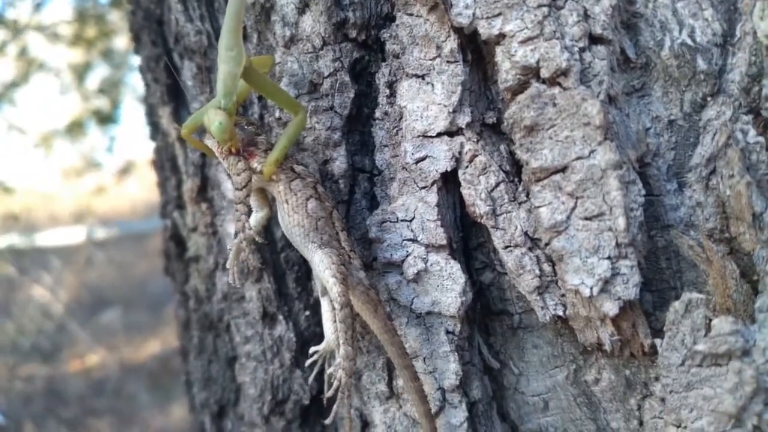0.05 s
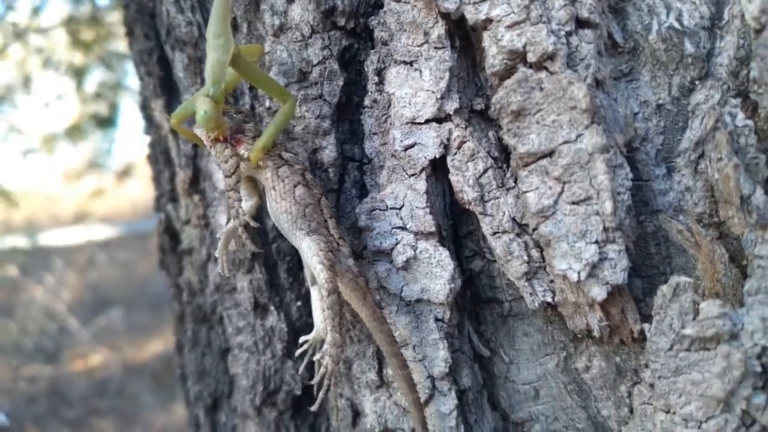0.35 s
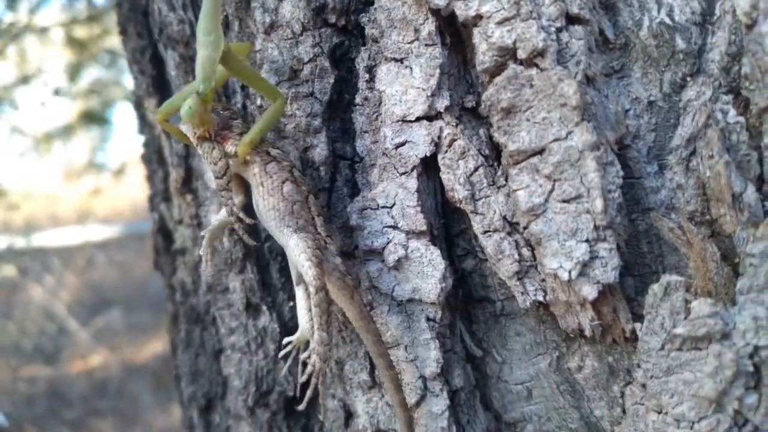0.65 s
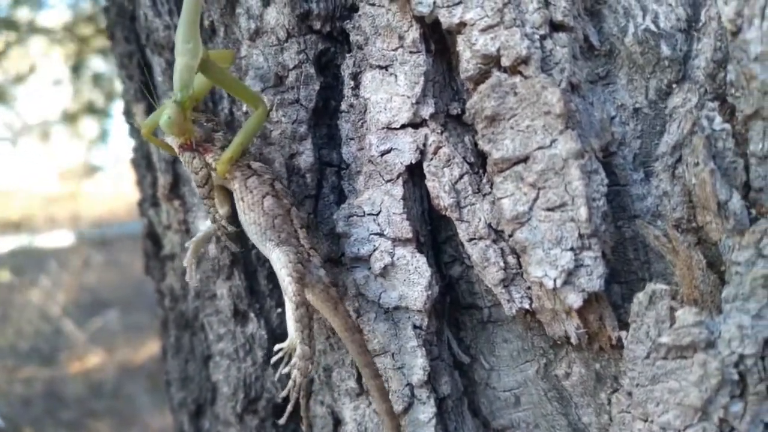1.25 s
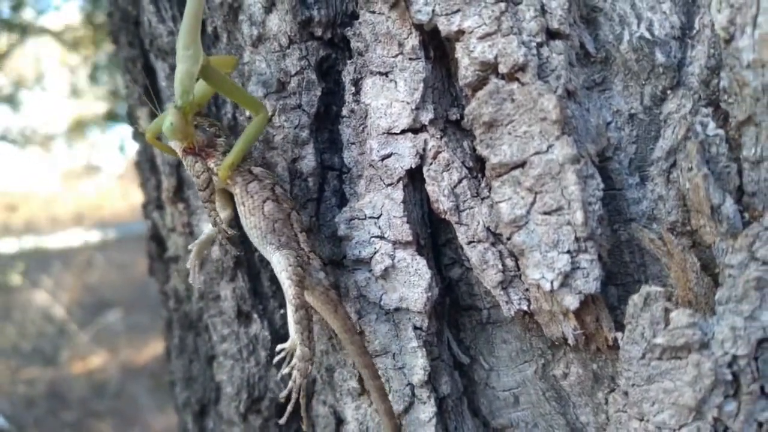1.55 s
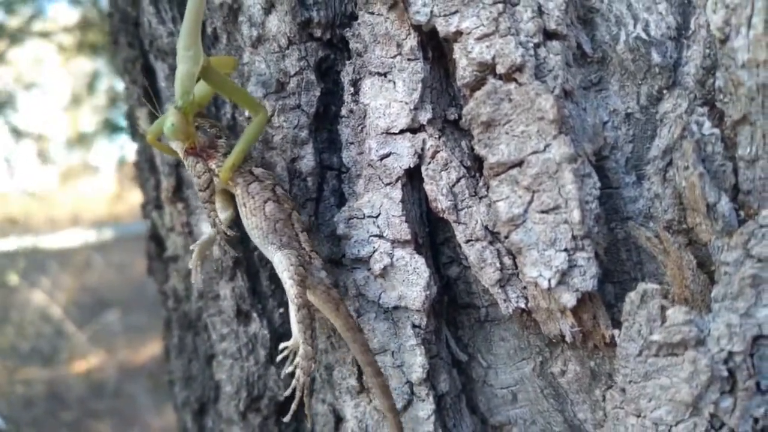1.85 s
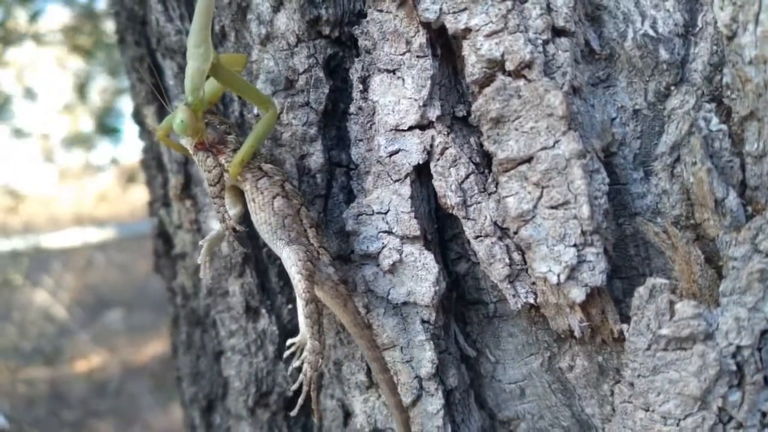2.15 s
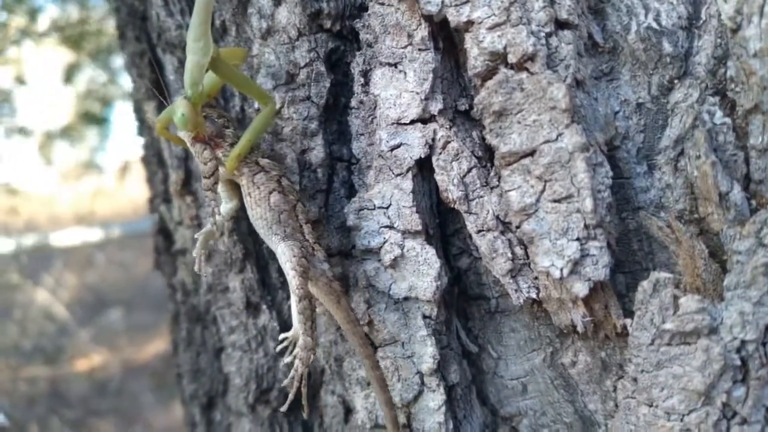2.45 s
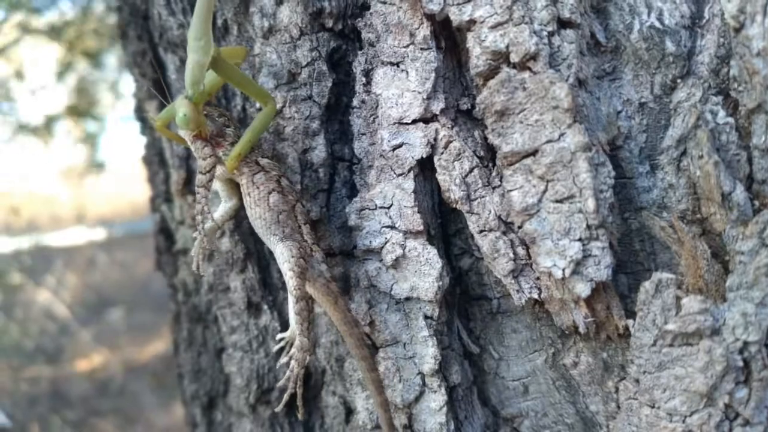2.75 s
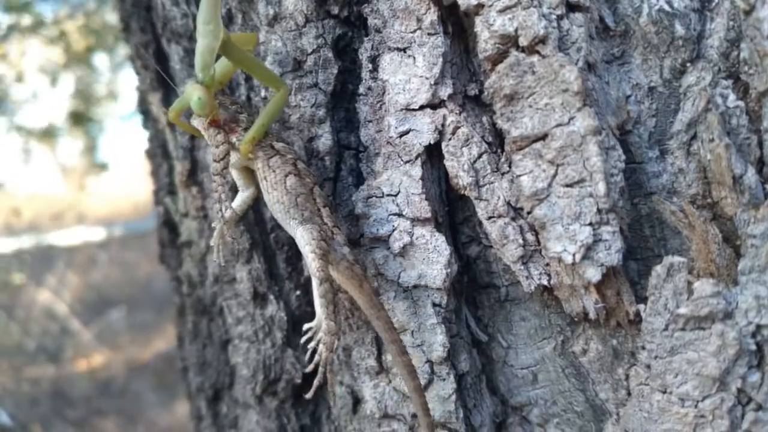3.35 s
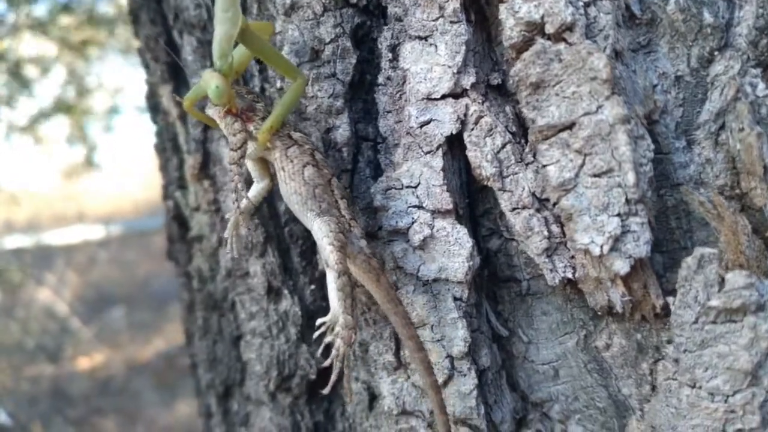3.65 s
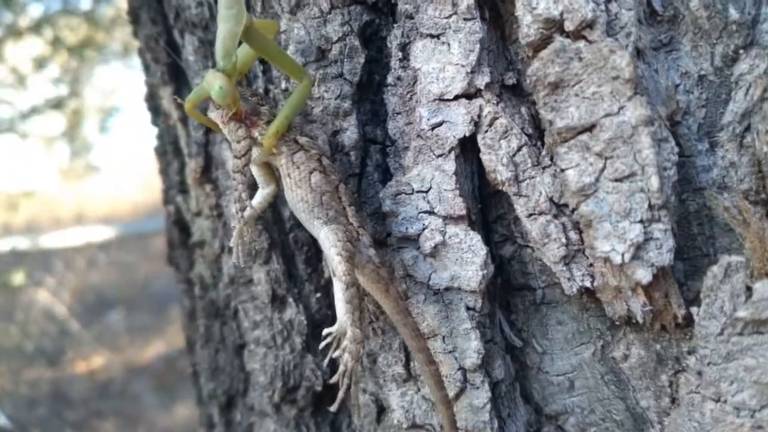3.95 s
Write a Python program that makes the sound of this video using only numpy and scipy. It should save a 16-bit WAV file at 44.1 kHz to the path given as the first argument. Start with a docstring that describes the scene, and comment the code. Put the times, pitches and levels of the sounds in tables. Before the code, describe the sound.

Wind rumbles low on the microphone, mostly on the left. Weak puffs lead to a gust with a soft knock at about 1.2 seconds; more follow from 1.7, strongest from 3 to 4. A thin hiss runs underneath. Very faint high bird chirps come near 0.6, 1.4, 2.2 and 3.7 seconds, tiny ticks near 1.4, 1.7 and 3.9, and a faint bark scrape at 3.3.

```python
"""Light gusts of wind buffet the two microphones of a camera held close to a tree trunk.
Swirling air makes each microphone's opening rumble by itself, brighter as the gust grows,
and now and then a single swirl lands with a soft knock. Behind the wind lie a thin steady hiss,
a few faint high chirps (probably small birds) echoing off the trees, a few tiny dry ticks
and one soft scrape on the bark."""
import sys
import numpy as np
from scipy import signal
from scipy.fft import rfft, irfft
from scipy.io import wavfile
from scipy.ndimage import uniform_filter1d

SR = 44100
rng = np.random.default_rng(int(sys.argv[2]) if len(sys.argv) > 2 else 0)


def inscribe(sig):
    """Save sig as 16-bit PCM at rate SR to the path in sys.argv[1].

    A 1-D sig is mono; a 2-D sig holds one channel per row.
    Samples are clipped to [-1, 1] before scaling.
    """
    pcm = np.round(np.clip(np.atleast_2d(sig).T, -1, 1) * 32767)
    wavfile.write(sys.argv[1], SR, pcm.astype(np.int16))


N = 4 * SR


def amp(db):
    """Turns decibels into a number to multiply a sound by."""
    return 10 ** (np.asarray(db) / 20)


def unit_level(x):
    """Scales a signal so that its average power is 1."""
    return x / np.sqrt(np.mean(x ** 2) + 1e-20)


def value_at(table, hz):
    """Reads between a table's rows, with frequencies spaced like musical pitch."""
    row_hz, value = np.transpose(table)
    return np.interp(np.log(hz + 1), np.log(row_hz + 1), value)


def noise(size, tone):
    """Noise of power 1; tone(hz) says how strong each frequency is."""
    hz = np.fft.rfftfreq(size, 1 / SR) + 1
    return unit_level(irfft(rfft(rng.standard_normal(size)) * tone(hz), size))


def wander(size, per_s):
    """A smooth random wobble, up to about per_s swings a second."""
    return noise(size, lambda f: 1 / (1 + (f / per_s) ** 4))


def hump(hz, octaves):
    """A tone for noise: strongest at hz, fading away above and below."""
    return lambda f: np.exp(-.5 * (np.log2(f / hz) / octaves) ** 2)


def place(mix, start, sound, lean_db):
    """Adds a sound to the mix. Lean is how much louder it is on the left than on the right."""
    part = mix[:, round(start * SR):][:, :len(sound)]
    part += amp([[lean_db / 2], [-lean_db / 2]]) * sound[:part.shape[1]]


# The wind at each microphone. Each row: time in seconds, strength in dB.
LEFT_GUSTS = [(0.0, -40.5), (0.02, -33), (0.17, -57), (0.37, -50), (0.57, -86), (0.77, -49), (0.8, -44),
              (0.95, -60), (1.04, -74), (1.06, -34.5), (1.16, -23), (1.29, -50), (1.4, -37.5), (1.52, -66),
              (1.69, -75), (1.72, -35), (1.76, -43.5), (1.79, -30), (1.82, -39), (1.89, -26.5),
              (1.92, -30.5), (1.97, -27.5), (2.35, -31.5), (2.38, -42.5), (2.4, -27), (2.49, -35),
              (2.54, -55), (2.69, -79), (2.72, -32), (2.84, -32), (2.9, -46), (2.92, -30.5), (2.98, -19.5),
              (3.19, -21.5), (3.22, -25.5), (3.26, -22.5), (3.39, -29.5), (3.51, -20), (3.55, -22),
              (3.6, -21.5), (3.69, -27.5), (3.73, -24.5), (3.99, -22), (4.0, -39)]
RIGHT_GUSTS = [(0.0, -44), (0.01, -39.5), (0.158, -52), (0.188, -35), (0.3, -54), (0.36, -41),
               (0.54, -71.5), (0.62, -41.5), (0.69, -46.5), (0.72, -41.5), (0.799, -41), (0.83, -47.5),
               (0.89, -44), (0.96, -62), (1.06, -34), (1.11, -34), (1.15, -30.5), (1.27, -34.5),
               (1.36, -54), (1.68, -51.5), (1.711, -43.5), (1.8, -50.5), (2.0, -32), (2.06, -47.5),
               (2.1, -35.5), (2.13, -50.5), (2.28, -48), (2.37, -76), (2.51, -43), (2.66, -60.5),
               (2.81, -53), (2.849, -34), (2.91, -29), (2.975, -25), (3.03, -34), (3.19, -35), (3.261, -26),
               (3.38, -33), (3.48, -28.5), (3.52, -39.5), (3.58, -31.5), (3.8, -37.5), (3.84, -28.5),
               (3.9, -41), (3.97, -28), (4.0, -35.5)]
# The rumble's tone before its highs are cut. Each row: frequency in Hz, relative level in dB.
LEFT_TONE = [(20, -34), (38, -18.5), (58, 1), (88, 2), (130, -4), (200, -5.5), (400, -15.5), (800, -14.5),
             (1400, -21.5)]
RIGHT_TONE = [(20, -30.5), (40, -16), (64, 0.5), (95, 0), (150, -5.5), (210, -5), (320, -8), (560, -6.5),
              (850, -19), (1400, -25.5)]
# The microphones, left then right. Each row: gain in dB, cutoff in Hz in a strong gust,
# how fast the sound fades above the cutoff in dB per octave.
MICS = [(-6.5, 417.4, 28), (-5, 280, 16)]


def wind_rumble(gusts, tone, gain_db, cutoff_hz, slope_db):
    """Air swirls at one microphone. Faster air sheds smaller swirls, so it sounds brighter."""
    strong_gust_db, octaves_per_db = -22.5, 0.0821
    gust_db = np.interp(np.arange(N) / SR, *np.transpose(gusts))
    swirls = wander(N, per_s=71)  # shakes both brightness and loudness
    cutoff_octave = np.log2(cutoff_hz) + octaves_per_db * (gust_db - strong_gust_db) + .06 * swirls
    hz = np.fft.rfftfreq(N, 1 / SR) + 1
    spectrum = rfft(rng.standard_normal(N)) * amp(value_at(tone, hz))
    rumble = np.zeros(N)
    for octave in np.arange(4, 11.5, .5):  # bands from 16 to 2048 Hz
        band = irfft(spectrum * np.maximum(1 - 2 * abs(np.log2(hz) - octave), 0), N)
        rumble += band / np.sqrt(1 + amp(2 * slope_db * (octave - cutoff_octave)))
    # Partly even out slow chance swells, so the rumble follows the gusts.
    swell_s, even_share = 0.065, 0.54
    window = signal.windows.hann(int(2 * swell_s * SR))
    power = signal.fftconvolve(unit_level(rumble) ** 2, window / window.sum(), "same")
    rumble = unit_level(rumble / (abs(power) + 1e-6) ** (even_share / 2))
    return rumble * amp(gust_db + gain_db + 1.8 * swirls)


# The tone of the outdoor hiss. Each row: frequency in Hz, relative level in dB.
HISS_TONE = [(40, -21.5), (100, 10), (250, -6.5), (450, -8), (620, -7), (850, -13), (1250, -17),
             (1900, -12.5), (2750, -12), (2950, -8.5), (3150, -11.5), (5200, -10.5), (6800, -5.5),
             (8300, -0.5), (9200, -6), (10000, -12.5), (11500, -18), (12500, -22.5), (15500, -26)]
# How the hiss favours the left. Each row: frequency in Hz, rough lean in dB.
HISS_LEFT_LEAN = [(100, 1.5), (700, 1.4), (2000, 2.7), (8000, 3.75), (15000, 2)]


def hiss_side(side):
    """The hiss in one ear: side is 1 for left, -1 for right."""
    air = noise(N, lambda f: amp(value_at(HISS_TONE, f) + side * value_at(HISS_LEFT_LEAN, f) / 2))
    return air * amp(side * value_at(HISS_LEFT_LEAN, 8000) / 2)


def hiss():
    """A thin, faintly patchy hiss, separate in each ear, that grows very slightly."""
    level_db, growth_db_per_s, patch_db = -64, 0.33, 1.8
    grid = signal.stft([hiss_side(1), hiss_side(-1)], nperseg=512)[2]  # ear, frequency, time
    patches = uniform_filter1d(rng.standard_normal(grid.shape), size=10, axis=1)
    patches = unit_level(uniform_filter1d(patches, size=14, axis=2))
    patchy = signal.istft(grid * amp(patch_db * patches), nperseg=512)[1][:, :N]
    return patchy * amp(level_db + growth_db_per_s * (np.arange(N) - N / 2) / SR)


def fluttering_fade(length, rise_s=0.011, fade_share=.55):
    """The loudness of a chirp or scrape: it rises fast, holds and fades, fluttering by about 1 dB."""
    t = np.arange(0, length, 1 / SR)
    rise = np.minimum(t / rise_s, 1)
    fade = np.minimum((1 - t / length) / fade_share, 1)
    return unit_level(rise * fade * amp(wander(len(t), per_s=200)))


# Thin whistled notes. Each row: start and length in seconds, first and last pitch in Hz,
# level in dB, lean to the left in dB.
BIRD_WHISTLES = [(0.555, 0.045, 7880, 6500, -64.5, 11), (1.369, 0.039, 7300, 7080, -72.5, 14),
                 (2.087, .035, 7300, 7800, -72, 18), (2.159, 0.12, 6340, 6430, -78.5, 25),
                 (3.666, 0.072, 6900, 8080, -71, 15)]
# Buzzy chirps. Each row: start and length in seconds, lowest and highest frequency in Hz,
# level in dB, lean to the left in dB.
BIRD_BUZZES = [(0.561, 0.11, 8950, 11650, -66.5, 3), (1.373, 0.055, 9100, 11200, -71, 14),
               (2.165, 0.19, 7600, 9360, -59.5, 4), (3.674, 0.067, 9200, 12000, -73.5, 13)]


def birds():
    """Small birds chirp: each call is a sliding, wavering whistle with a high buzz of noise."""
    waver_share, edge_hz = .28, 170
    out = np.zeros((2, N))
    for start, length, first_hz, last_hz, db, lean_db in BIRD_WHISTLES:
        loudness = fluttering_fade(length)
        slide_hz = np.linspace(first_hz, last_hz, len(loudness))
        waver_hz = waver_share * abs(last_hz - first_hz) * wander(len(loudness), per_s=200)
        whistle = unit_level(np.sin(2 * np.pi * np.cumsum(slide_hz + waver_hz) / SR))
        place(out, start, amp(db) * loudness * whistle, lean_db)
    for start, length, low_hz, high_hz, db, lean_db in BIRD_BUZZES:
        loudness = fluttering_fade(length)
        buzz = noise(len(loudness),
                     lambda f: np.tanh((f - low_hz) / edge_hz) - np.tanh((f - high_hz) / edge_hz))
        place(out, start, amp(db) * loudness * buzz, lean_db)
    return out


def tree_echo(sound, level_db=-5, fade_s=0.31):
    """Trunks and leaves scatter a sound into a short echo that drops 60 dB in fade_s."""
    t = np.arange(SR // 2) / SR
    tail = rng.standard_normal((2, len(t))) * amp(-60 * t / fade_s)
    tail /= np.linalg.norm(tail[0])
    return amp(level_db) * signal.fftconvolve(sound, tail, axes=1)[:, :N]


# Single swirls of air, plus one tiny sharp tick at 3.005 s. Each row: time of the middle in seconds, pitch in
# Hz, length in seconds, # level at the top of the swell in dB, microphone (0 is left, 1 is right).
WIND_KNOCKS = [(1.163, 133, 0.01, -17.5, 0), (1.725, 257, 0.012, -38.5, 0), (1.795, 183, 0.011, -28.5, 0),
               (1.882, 166, 0.0091, -26.5, 0), (2.074, 151, .009, -24, 0), (2.407, 164, 0.0047, -18.5, 0),
               (2.429, 91, 0.013, -23, 0), (2.725, 113, 0.0061, -25, 0), (2.942, 106, 0.02, -20, 1),
               (2.975, 124, 0.013, -17.5, 0), (3.005, 970, 0.0011, -39, 0), (3.054, 286, .01, -24, 0),
               (3.071, 109, 0.012, -18.5, 0), (3.133, 310, 0.0053, -23, 0), (3.177, 107, 0.015, -17.5, 0),
               (3.521, 97, 0.013, -13.5, 0), (3.587, 255, .008, -24, 0)]


def wind_knocks():
    """One swirl hits a microphone, and a swing or two of pressure makes a rounded knock; the very short 970 Hz
    row at 3.005 s is a tiny tick instead."""
    out, t = np.zeros((2, N)), np.arange(N) / SR
    for middle, hz, length, db, mic in WIND_KNOCKS:
        swell = 2 ** -((2 * (t - middle) / length) ** 2)
        out[mic] += amp(db) * swell * np.sin(2 * np.pi * (hz * (t - middle) + rng.random()))
    return out


# Dry ticks. Each row: start in seconds, pitch in Hz, peak level in dB, lean to the left in dB.
DRY_TICKS = [(1.382, 10000, -49.5, 21), (1.689, 8900, -50, 0), (3.889, 8130, -44, -13)]


def ticks(decay_s=.0007):
    """Tiny bright snaps of noise that die in a few thousandths of a second."""
    out, t = np.zeros((2, N)), np.arange(1024) / SR
    for start, hz, db, lean_db in DRY_TICKS:
        snap = noise(len(t), hump(hz, octaves=.26)) * t * np.exp(-t / decay_s)
        place(out, start, amp(db) * snap / abs(snap).max(), lean_db)
    return out


# A soft scrape. Each row: start and length in seconds, pitch in Hz, level in dB, lean to the left in dB.
BARK_SCRAPES = [(3.273, 0.11, 6800, -66.5, 14)]


def bark_scrape(grain_db=4):
    """Something light brushes the bark, catching on its grain."""
    out = np.zeros((2, N))
    for start, length, hz, db, lean_db in BARK_SCRAPES:
        fade = fluttering_fade(length)
        catches = amp(grain_db * wander(len(fade), per_s=400))
        rub = noise(len(fade), hump(hz, octaves=.26))
        place(out, start, amp(db) * unit_level(fade * catches) * rub, lean_db)
    return out


def scene():
    """Wind on both microphones over the quiet outdoors. Only the birds echo."""
    wind = np.array([wind_rumble(LEFT_GUSTS, LEFT_TONE, *MICS[0]),
                     wind_rumble(RIGHT_GUSTS, RIGHT_TONE, *MICS[1])])
    calls = birds()
    return wind + wind_knocks() + hiss() + calls + tree_echo(calls) + bark_scrape() + ticks()


def record(dry):
    """Cuts off the very highest treble, above 15720 Hz."""
    treble_cut = signal.firwin(511, 15720, window=("kaiser", 9), fs=SR)
    return signal.oaconvolve(dry, treble_cut[None], "same")


dry = scene()
out = record(dry)
inscribe(out)
```